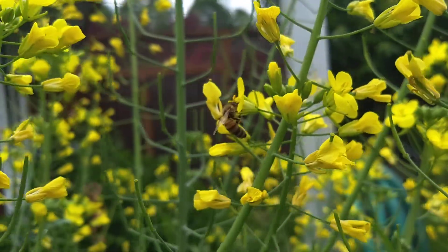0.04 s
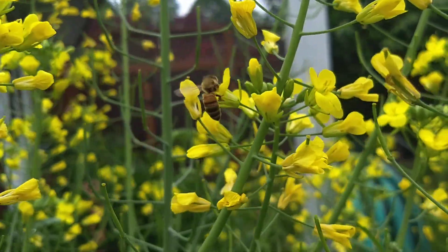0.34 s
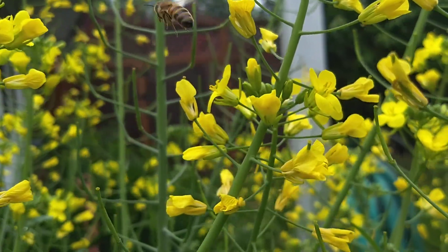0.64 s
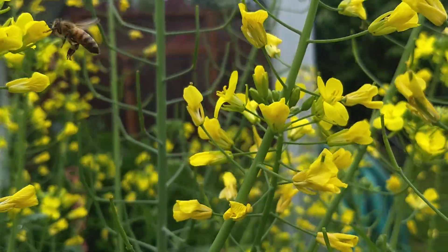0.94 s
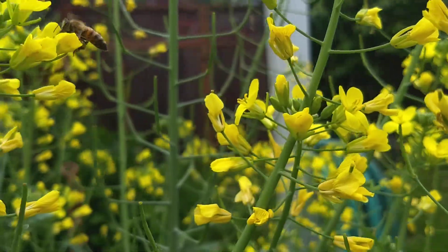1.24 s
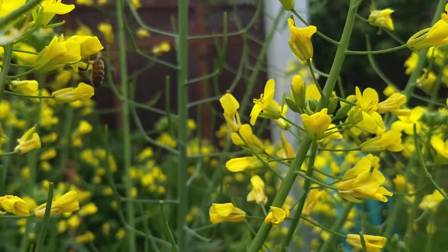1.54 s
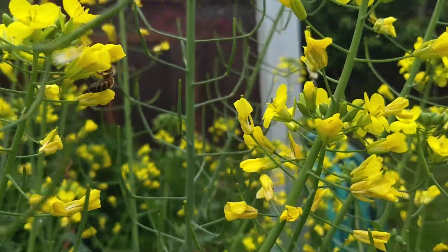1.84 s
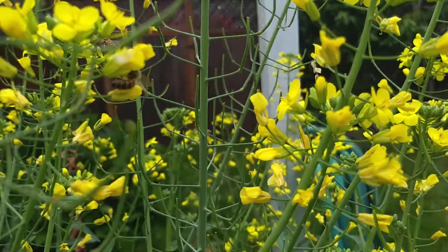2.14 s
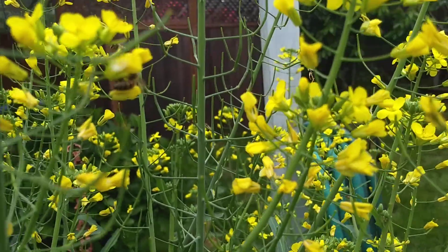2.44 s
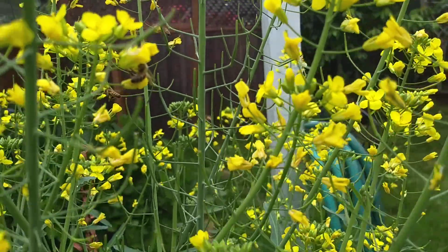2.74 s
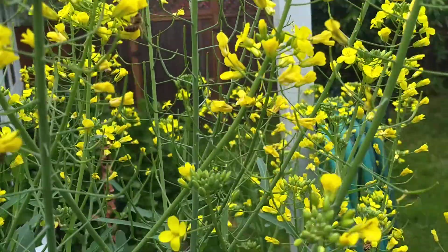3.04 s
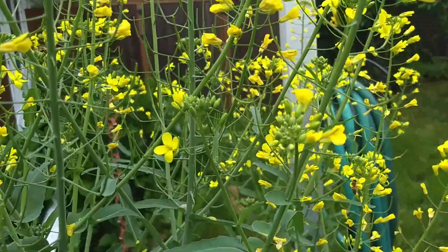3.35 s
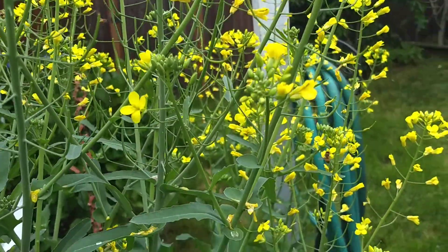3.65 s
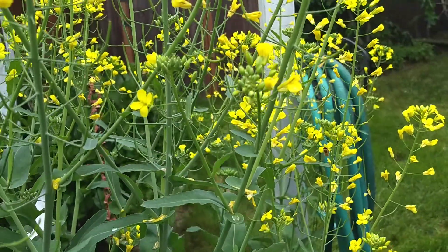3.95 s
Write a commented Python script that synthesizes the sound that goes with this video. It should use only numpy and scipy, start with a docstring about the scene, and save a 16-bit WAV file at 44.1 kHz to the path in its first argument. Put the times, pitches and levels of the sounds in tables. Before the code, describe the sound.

Honeybees buzz close by over faint garden hiss, then fingers knock on the microphone.

```python
"""A garden bed of yellow flowers, heard close up on a hand-held camera whose two microphone ports make a
wide, hollow stereo. From the start one honeybee's wings buzz close by, more hum farther off, and leaves
rustle softly over the garden's hush. Around one second a soft swish and a puff of air brush the
microphone. At two seconds another bee joins at a higher pitch, and the grip shifts with two low bumps.
Near the end fingers knock on the camera's case."""
import sys
import numpy as np
from scipy import signal
from scipy.fft import rfft, irfft
from scipy.io import wavfile
from scipy.ndimage import map_coordinates

SR = 44100
rng = np.random.default_rng(int(sys.argv[2]) if len(sys.argv) > 2 else 0)


def output_pcm(signal):
    """Save a mono or channel-first signal as 16-bit PCM at the path in sys.argv[1].

    Samples are clipped to [-1, 1] before scaling.
    """
    pcm = np.clip(np.atleast_2d(signal).T, -1, 1) * 32767
    wavfile.write(sys.argv[1], SR, np.round(pcm).astype(np.int16))


N = 176400


def undb(db):
    """Decibels to gain."""
    return 10 ** (np.asarray(db) / 20)


def seconds():
    """The time of every sample."""
    return np.arange(N) / SR


def curve(rows, column=1):
    """One column of a table, joined by straight lines in time."""
    rows = np.array(rows)
    return np.interp(seconds(), rows[:, 0], rows[:, column])


def colour(points, hz):
    """Gain of a (freq_hz, gain_db) spectrum at the given frequencies."""
    points = np.array(points)
    return undb(np.interp(np.log(np.maximum(hz, 1)), np.log(points[:, 0]), points[:, 1]))


def shaped(x, points):
    """Filter a sound with a (freq_hz, gain_db) spectrum."""
    return irfft(rfft(x, 2 * N) * colour(points, np.fft.rfftfreq(2 * N, 1 / SR)))[:N]


def noise(points):
    """Noise with the given density in dB per Hz."""
    return shaped(rng.standard_normal(N), points) * np.sqrt(SR / 2)


def unit(x):
    """Scale to rms 1."""
    return x / np.std(x)


def drift(per_s):
    """Smooth random drift with spread near 1."""
    steps = rng.standard_normal(N // 10)
    return map_coordinates(steps, [seconds() * per_s], order=2, mode="wrap")


def late(x, delay_s):
    """Delay a sound, also by fractions of a sample."""
    return map_coordinates(x, [np.arange(N) - delay_s * SR], order=3)


def garden_hush():
    """Faint hiss and rumble, unrelated at the two ports, over a distant rumble that reaches both alike."""
    # garden hush and port noise: freq_hz, density_db_per_hz
    hush_spectrum = [(20, -113), (38, -81), (68, -66.5), (100, -84.5), (180, -76.5), (320, -88), (600, -94),
                     (1300, -97), (2200, -100), (4500, -106), (15000, -108)]
    # distant rumble: freq_hz, density_db_per_hz
    rumble_spectrum = [(25, -100), (72, -65), (160, -76.5), (2000, -115)]
    swell_db = 2.4
    ports = np.array([noise(hush_spectrum) * undb(swell_db * drift(per_s=16)) for _ in range(2)])
    return ports + noise(rumble_spectrum)


def leaves():
    """Leaves to the left: a fine grainy rustle with a few sharper, crackling ticks."""
    # course of the rustle: time_s, level_db
    rustle_levels = [(0, -76), (.26, -65), (.31, -58.5), (.54, -55), (.62, -55.5), (.8, -59), (1.05, -55),
                     (1.3, -55.5), (1.58, -62), (1.72, -57), (1.95, -53), (2.25, -60.5), (2.8, -61),
                     (3.2, -70), (4, -61.5)]
    # colour of the leaves: freq_hz, gain_db
    leaf_tone = [(200, -1), (1100, 3), (2200, -2), (4000, 0.5), (8000, 0), (12000, -4.5), (15500, -1)]
    # leaf ticks: start_s, level_db
    leaf_ticks = [(0.284, -48), (0.315, -46.5), (0.527, -44.5), (0.540, -48), (1.688, -53), (1.907, -47),
                  (1.984, -51), (2.028, -49), (2.08, -53), (2.758, -51)]
    grain_db, crackle_db, tick_decay_s, far_port_db = 2.5, 4, .006, -7
    t = seconds()
    envelope = undb(curve(rustle_levels) + grain_db * drift(per_s=600))
    crackle = undb(crackle_db * (drift(per_s=900) - .5))
    for start, db in leaf_ticks:
        envelope += undb(db) * crackle * (t >= start) * np.exp(-np.abs(t - start) / tick_decay_s)
    return envelope * np.array([unit(noise(leaf_tone)), undb(far_port_db) * unit(noise(leaf_tone))])


def swishes():
    """Something brushes softly past the right port: brief, hollow and rough."""
    # soft swishes: peak_s, level_db
    swish_peaks = [(0.885, -51), (1.92, -62)]
    # their colour: freq_hz, gain_db
    swish_tone = [(300, -6), (850, -3), (1900, -41)]
    half_length_s = 0.024
    envelope = sum(undb(db) * np.exp(-((seconds() - peak) / half_length_s) ** 2)
                   for peak, db in swish_peaks)
    return np.array([np.zeros(N), envelope * unit(noise(swish_tone))])


def air_puffs():
    """Air brushes the left port in soft, low puffs."""
    # air on the microphone: peak_s, half_length_s, level_db
    puff_peaks = [(0.94, 0.16, -44), (1.12, 0.011, -41)]
    # its colour: freq_hz, gain_db
    puff_tone = [(25, -34), (70, -8), (160, 9), (300, -8.5), (2000, -32), (8000, -81)]
    envelope = sum(undb(db) * np.exp(-((seconds() - peak) / half) ** 2) for peak, half, db in puff_peaks)
    return np.array([envelope * unit(noise(puff_tone)), np.zeros(N)])


def grip_bumps():
    """The grip shifts by the right port: short low swells that sag in pitch, with no click."""
    # bumps of the hand on the camera: peak_s, level_db
    bump_peaks = [(2.26, -30), (2.853, -26.5)]
    pitch_at_peak_hz, half_length_s, sag_s = 90, 0.013, 0.025
    bumps = np.zeros(N)
    for peak, db in bump_peaks:
        t = np.clip(seconds() - peak, -.1, .1)
        cycles = pitch_at_peak_hz * sag_s * (1 - np.exp(-t / sag_s))
        bumps += undb(db) * np.exp(-(t / half_length_s) ** 2) * np.sin(2 * np.pi * cycles)
    return np.array([np.zeros(N), bumps])


def case_ring(t, touch_hz):
    """The case's modes die away, detuned anew at each knock; those above touch_hz are barely excited."""
    # modes of the camera's case: freq_hz, gain_db, t60_s
    case_modes = [(486, -3, 0.02), (789, -1, 0.014), (1220, 3, 0.0061), (1960, -5, 0.0077),
                  (2680, -14, 0.015), (3470, -5.5, 0.0095)]
    detunes = 1 + 0.073 * rng.standard_normal(len(case_modes))
    ring = np.zeros(len(t))
    for (hz, db, t60), detune in zip(case_modes, detunes):
        gain = undb(db) / (1 + (hz / touch_hz) ** 4)
        ring += gain * np.sin(2 * np.pi * hz * detune * t) * np.exp(-np.log(1000) * t / t60)
    return ring


def finger_knocks():
    """Fingers tap by the right port: a click, a ring and a thud that sags; a soft touch is duller."""
    # knocks: start_s, thud_db, ring_db, click_db, touch_hz (top of the range that the touch excites)
    finger_taps = [(3.4877, -19.5, -26, -29, 890), (3.5111, -10.5, -19, -17.5, 4520),
                   (3.5302, -18.5, -19, -27.5, 590), (3.6253, -8.5, -14, -18.5, 2160),
                   (3.6319, -20.5, -31, -30, 910), (3.6381, -8.5, -24, -33, 860),
                   (3.7220, -14, -18.5, -19, 2550), (3.8255, -14.5, -25.5, -19.5, 5960),
                   (3.8690, -23, -45, -68, 497), (3.9895, -9.5, -19, -30, 850)]
    # colour of the click: freq_hz, gain_db
    click_tone = [(300, 6), (1400, 9.5), (3200, 1), (4800, -12.5), (8000, -6.5), (12000, -22), (16000, -45)]
    thud_floor_hz, max_sag_hz, sag_s, thud_decay_s = 105, 1080, 0.00069, 0.0066
    attack_s, click_s, scrape_s, scrape_db = 0.00043, .00055, 0.012, -22
    knocks, t = np.zeros(2 * N), seconds()[:SR // 10]
    onset = 1 - np.exp(-t / attack_s)
    grit = unit(noise(click_tone))
    contact = np.exp(-t / click_s) + undb(scrape_db) * np.exp(-t / scrape_s)
    for k, (start, thud_db, ring_db, click_db, touch_hz) in enumerate(finger_taps):
        thud_hz = thud_floor_hz + np.exp(-t / sag_s) / (1 / max_sag_hz + 1 / touch_hz)
        thud = onset * np.sin(2 * np.pi * np.cumsum(thud_hz) / SR) * np.exp(-t / thud_decay_s)
        ring = onset * case_ring(t, touch_hz)
        ring /= np.abs(ring).max()
        click = contact * grit[k * len(t):(k + 1) * len(t)]
        i = int(start * SR)
        knocks[i:i + len(t)] += undb(thud_db) * thud + undb(ring_db) * ring + undb(click_db) * click
    return np.array([np.zeros(N), knocks[:N]])


def wings(hz, db, tone, bright_db=0, jitter=.017):
    """One bee's wingbeat harmonics: the pitch wavers, the overtones flutter and the upper ones rasp."""
    wander, rasp_depth, flutter_db = .004, 0.56, 1.5
    beat_hz = hz * (1 + wander * drift(per_s=16) + jitter * drift(per_s=120))
    phase = 2 * np.pi * np.cumsum(beat_hz) / SR
    orders = np.arange(1, 19)
    gains = colour(tone, orders * np.mean(hz))
    offsets = rng.uniform(0, 2 * np.pi, len(orders))
    partials = [gain * np.sin(k * phase + offset) for k, gain, offset in zip(orders, gains, offsets)]
    rasp = 1 + rasp_depth * drift(per_s=70)
    overtones = partials[1] + rasp * sum(partials[2:])
    brightness = undb(bright_db + flutter_db * drift(per_s=16))
    return (partials[0] + brightness * overtones) * undb(db) / np.std(sum(partials))


def distant_bees():
    """Four bees farther off, each on its own pitch, fade in and out among the flowers."""
    # course of each bee's hum: time_s, level_db
    hum_levels = [(0, -63.5), (.6, -64.5), (1.5, -61.5), (2.1, -57.5), (2.9, -61), (3.4, -66), (4, -60.5)]
    # strength of the wingbeat's harmonics: freq_hz, gain_db
    wing_tone = [(230, 2), (460, -0.5), (690, -11), (920, -10.5), (1200, -6), (1600, -14.5), (2200, -31.5),
                 (5000, -14.5)]
    centre_hz, spread, fade_db = 228.7, .075, 2.6
    hum = np.zeros(N)
    for detune in np.linspace(-spread, spread, 4):
        hz = centre_hz * (1 + detune + .02 * drift(per_s=7))
        hum += wings(hz, curve(hum_levels) + fade_db * drift(per_s=7), wing_tone)
    return hum


def second_bee():
    """Another close bee joins midway; its faster wingbeat gives a higher pitch."""
    # its flight: time_s, wingbeat_hz, level_db
    flight = [(1.85, 246.6, -93), (2.1, 246.2, -53.5), (2.3, 259.1, -53), (2.6, 253.5, -57),
              (2.85, 259.2, -55), (3.1, 257, -55), (3.4, 253, -68.5)]
    # strength of the wingbeat's harmonics: freq_hz, gain_db
    wing_tone = [(250, -4.5), (510, -7.5), (770, -18), (1020, -18), (1280, -14.5), (1550, -15), (2200, -23),
                 (5000, -34)]
    fade_db = 1.3
    return wings(curve(flight), curve(flight, column=2) + fade_db * drift(per_s=7), wing_tone)


def near_bee():
    """A bee hovers close to the microphone; its overtones grow as it turns."""
    # its flight: time_s, wingbeat_hz, level_db, overtone_boost_db
    flight = [(0, 222, -69, -6), (.22, 212, -71, 6), (.32, 225, -47.5, -5.5), (.42, 230, -47.5, -3.5),
              (.59, 215, -42.5, -5), (.68, 216, -46.5, 2), (.77, 227, -50.5, 2), (.88, 222, -52, -1),
              (.98, 218, -50, -1.5), (1.17, 219, -59.5, 4), (1.32, 221, -48, -2), (1.6, 217, -67, 10),
              (1.92, 220, -48.5, 0.5), (2.15, 229, -61.5, 8), (2.5, 226, -64, -17), (2.75, 217, -52.5, -3),
              (3.1, 220, -67.5, 6.5), (4, 220, -56, 4)]
    # strength of the wingbeat's harmonics: freq_hz, gain_db
    wing_tone = [(220, 1), (440, -7.5), (660, -14), (880, -19.5), (1100, -10.5), (1340, -19.5),
                 (1560, -22.5), (2200, -39), (5000, -30)]
    return wings(curve(flight), curve(flight, column=2), wing_tone,
                 bright_db=curve(flight, column=3), jitter=.007)


def bees():
    """All the bees are off to the left, so their buzz reaches the right port later and weaker."""
    far_port_db = -6.5
    buzz = near_bee() + second_bee() + distant_bees()
    return np.array([buzz, undb(far_port_db) * late(buzz, delay_s=0.00041)])


def scene():
    """The sound at the camera's left and right ports."""
    return bees() + garden_hush() + leaves() + swishes() + air_puffs() + grip_bumps() + finger_knocks()


def record(dry):
    """Each channel is its own port minus a slightly delayed, dulled copy of the other; the top is cut."""
    # share of the other port that each channel subtracts: freq_hz, gain_db
    cross_feed = [(2500, -1), (7000, -1.8), (15000, -3)]
    port_delay_s, top_hz, right_db = 19 / SR, 15800, .6
    left = dry[0] - shaped(late(dry[1], port_delay_s), cross_feed)
    right = dry[1] - shaped(late(dry[0], port_delay_s), cross_feed)
    top_cut = signal.ellip(10, .2, 70, top_hz, fs=SR, output="sos")
    return signal.sosfilt(top_cut, np.array([left, undb(right_db) * right]))


dry = scene()
out = record(dry)
output_pcm(out)
```